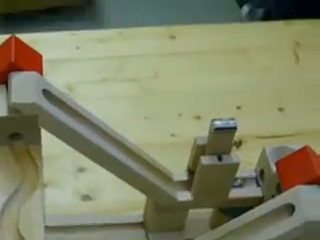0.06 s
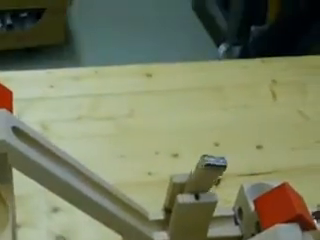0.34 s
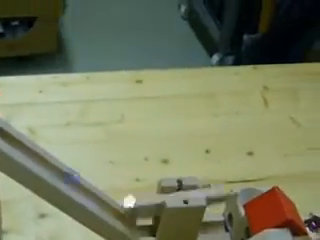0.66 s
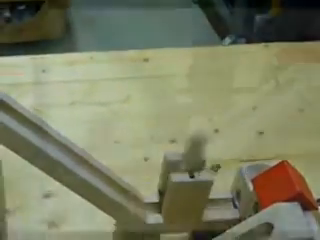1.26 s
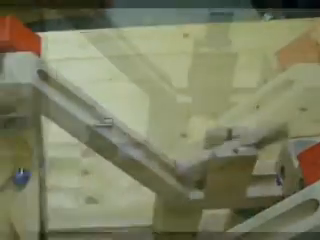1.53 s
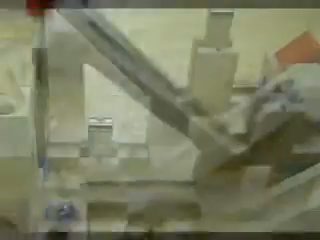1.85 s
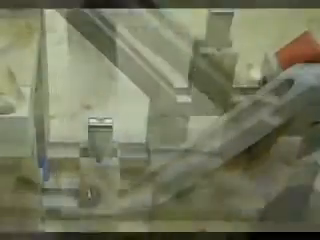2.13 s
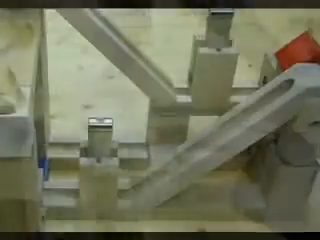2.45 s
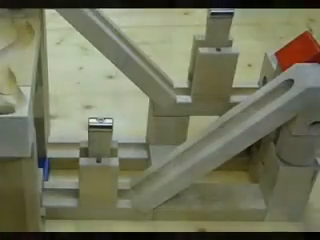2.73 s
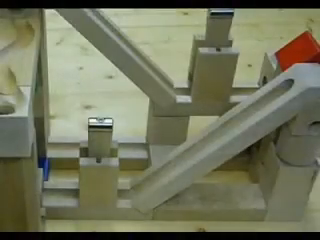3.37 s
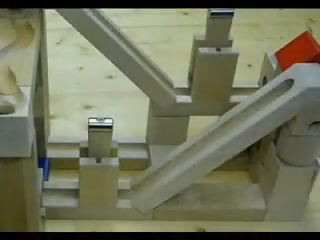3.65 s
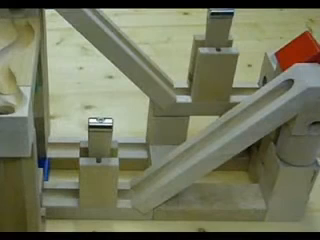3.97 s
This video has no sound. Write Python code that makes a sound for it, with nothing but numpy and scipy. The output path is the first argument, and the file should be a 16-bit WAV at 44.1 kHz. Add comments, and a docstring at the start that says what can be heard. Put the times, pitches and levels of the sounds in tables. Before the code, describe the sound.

Irregular wooden knocks and a low rumble of rolling marbles die down to faint taps.

```python
"""Knocks and a low rumble: marbles run down a wooden toy track, striking pivoting levers. Each impact excites
the resonances of track and table and reverberates in a workshop; rolling over the grain of the grooves makes
the rumble. The sound fades away to a few small taps. The microphone is dull above 4 kHz, and one short dry pop
breaks in near the end."""
import sys
import numpy as np
from scipy import signal
from scipy.io import wavfile
from scipy.ndimage import uniform_filter1d

SR = 44100
rng = np.random.default_rng(int(sys.argv[2]) if len(sys.argv) > 2 else 0)


def log_audio(samples):
    """Write samples as a 16-bit WAV file to the path given in sys.argv[1]."""
    # one column per channel
    frames = np.atleast_2d(samples).T
    # limit to full scale, then quantise
    limited = np.clip(frames, -1, 1)
    pcm = np.round(limited * 32767).astype(np.int16)
    wavfile.write(sys.argv[1], SR, pcm)


N = 176400
TIME = np.arange(N) / SR

# frequency response of the microphone: (f/Hz, gain/dB)
MIC_RESPONSE = [(3750, 2), (3900, -4), (4050, -19), (4600, -20), (5300, -48.5), (7000, -56.5),
                (12000, -59.5)]


def amp(db):
    """Amplitude ratio of a level in decibels."""
    return 10 ** (np.asarray(db) / 20)


def unit_energy(x):
    """Normalisation to an energy of one."""
    return x / np.sqrt(np.sum(x ** 2) + 1e-20)


def unit_rms(x):
    """Normalisation to an rms of one."""
    return unit_energy(x) * np.sqrt(x.size)


def curve(points, hz=abs(np.fft.fftfreq(2048, 1 / SR))):
    """Interpolation over log frequency, by default at the bins of a full FFT."""
    f, value = np.transpose(points)
    return np.interp(np.log(hz + 1), np.log(f + 1), value)


def add(mix, start_s, sound):
    """Superposition of a delayed sound on the mix."""
    part = mix[max(round(start_s * SR), 0):][:len(sound)]
    part += sound[:len(part)]


def minimum_phase(gain_db):
    """Causal impulse response of a gain curve, its phase given by the Hilbert transform."""
    log_spectrum = np.conj(signal.hilbert(np.log(amp(gain_db))))
    return np.fft.ifft(np.exp(log_spectrum)).real[:len(gain_db) // 2]


def convolve(x, response):
    """Linear filtering, cut to the length of x."""
    return signal.oaconvolve(x, response)[:len(x)]


def room_tail(size=32768, build_up_s=0.0034):
    """Reverberation: dense reflections decay exponentially, the treble first."""
    # reverberation time of the workshop: (f/Hz, T60/s)
    decay_times = [(100, .8), (300, 0.38), (900, 0.46), (2000, 0.49), (3700, 0.45), (5200, 0.11)]
    hz, t, spectra = signal.stft(rng.standard_normal(size), SR, nperseg=256)
    decay = amp(-60 * t / curve(decay_times, hz)[:, None])
    tail = signal.istft(spectra * decay, SR)[1][:size]
    return unit_energy(tail * np.minimum(np.arange(size) / SR / build_up_s, 1))


def rolling(bumps_per_s=900, wobble_db=4):
    """Roughness excitation: marbles bump over the wood grain, giving a rumble and a finer rattle."""
    # course of the rolling noise: (t/s, rumble level/dB, rattle level/dB)
    levels = [(0, -38.5, -32.5), (.25, -34, -36.5), (.43, -43, -40.5), (0.679, -40.5, -36),
              (0.948, -39.5, -41), (1.1, -35, -31.5), (1.22, -35, -41.5), (1.49, -38, -44),
              (1.58, -44.5, -44), (1.8, -37, -36.5), (1.88, -45, -46.5), (2.08, -40.5, -44),
              (2.2, -50.5, -53), (2.48, -47.5, -51.5), (2.56, -48, -49), (2.85, -58, -64),
              (3.05, -68.5, -72)]
    # spectra of rumble and rattle: (f/Hz, relative level/dB)
    rumble_spectrum = [(30, -7), (80, -16.5), (125, -1.5), (210, -0.5), (380, 1.5), (550, -0.5),
                       (900, -3.5), (2000, -29), (4000, -57)]
    rattle_spectrum = [(100, -29), (500, -13.5), (1000, 10.5), (1600, 4), (2600, 0), (3800, -4.5),
                       (8000, -18)]
    times, rumble_db, rattle_db = np.transpose(levels)
    sign = rng.choice([-1, 1], N)
    wobble = np.tanh(unit_rms(uniform_filter1d(rng.standard_normal(N), size=1500)))
    bumps = sign * (rng.random(N) < bumps_per_s / SR) * amp(wobble_db * wobble)
    bumps = bumps + convolve(bumps, room_tail())
    out = np.zeros(N)
    for spectrum, db in [(rumble_spectrum, rumble_db), (rattle_spectrum, rattle_db)]:
        response = minimum_phase(curve(spectrum) + curve(MIC_RESPONSE))
        out += amp(np.interp(TIME, times, db)) * unit_rms(convolve(bumps, response))
    return out


def contact(size=2048, bounces_per_s=2600, decay_s=0.0045, chatter_db=1.5):
    """Rebound: one sharp impulse, then milliseconds of chatter as the marble bounces on the wood."""
    t = np.arange(size) / SR
    bounces = rng.standard_normal(size) * (rng.random(size) < bounces_per_s / SR)
    force = amp(chatter_db) * unit_energy(bounces * np.sqrt(t) * np.exp(-t / decay_s))
    force[0] += 1
    return force


def resonate(x, hz, stage_width_hz):
    """Resonance with steep skirts: two equal band-pass stages in cascade."""
    b, a = signal.iirpeak(hz, hz / stage_width_hz, SR)
    return signal.lfilter(b, a, signal.lfilter(b, a, x))


def knocks(tail_count=7, attack_widening=1.5, gain_db=22):
    """Impact excitation: the table thuds, the wood clacks, the struck piece rings; all reverberate."""
    # marble and lever impacts, in relative levels:
    # (t/s, thud level/dB, clack level/dB, ring level/dB, ring f/Hz, reverberation level/dB)
    impacts = [(.0015, -25, -25, -16.5, 2760, -14), (0.0194, -24, -19, -20, 2910, 6),
               (0.1541, -31, -27, -32, 2800, 6), (0.2286, -28.5, -28, -10.5, 2540, 3),
               (0.2449, -44.5, -36.5, -13, 2804, 6.5), (0.281, -27.5, -19, -13.5, 2730, -7.5),
               (0.3205, -38.5, -37, -18, 3513, 9.5), (0.529, -45.5, -31.5, -30.5, 2510, 13.5),
               (.552, -37.5, -29.5, -32, 2920, 11), (0.7545, -27, -22, -15, 3280, 4),
               (0.7683, -27, -25, -14.5, 2420, 1.5), (0.774, -35.5, -35, -12, 3086, 5),
               (0.8868, -37, -35.5, -21.5, 2630, -5), (0.8916, -39.5, -26.5, -14, 3170, -4.5),
               (0.9752, -30, -23.5, -15, 2650, -0.5), (1.0329, -32, -29, -37.5, 2950, 4),
               (1.044, -36.5, -20.5, -31, 3100, -0.5), (1.1122, -34.5, -30.5, -34.5, 2410, 6),
               (1.2256, -29, -20.5, -57, 2790, -2.5), (1.2597, -26, -19.5, -20.5, 2760, 2),
               (1.2963, -40, -33.5, -20.5, 2400, 1), (1.3325, -47, -29, -29, 3000, -6),
               (1.594, -29.5, -23, -47, 2600, -4), (1.6253, -27.5, -19.5, -17, 2760, -4.5),
               (1.684, -32, -21.5, -19, 2630, -3), (1.7361, -34, -22.5, -22.5, 2560, -10),
               (2.0092, -32, -31, -32, 2580, 2.5), (2.0419, -39, -28, -28.5, 3320, -8),
               (2.5149, -41, -49.5, -43, 2310, -1.5), (2.6429, -47.5, -51.5, -46.5, 2265, 5.5),
               (2.8134, -54.5, -41.5, -45, 2540, 4), (2.931, -55, -56, -41.5, 2700, -9),
               (3.1103, -63, -53.5, -51, 2890, 2), (3.128, -60.5, -55.5, -58.5, 2874, 6),
               (3.3877, -73.5, -58.5, -66, 2780, -2), (3.4955, -62, -61, -57.5, 1110, 12.5),
               (3.574, -59.5, -61.5, -61, 970, 5), (3.69, -70.5, -50, -51.5, 2297, -3.5),
               (3.701, -59, -56.5, -52, 2520, 0.5)]
    # spectra of thud and clack: (f/Hz, relative level/dB)
    thud_spectrum = [(40, -17.5), (90, -11), (135, 2), (210, -5), (300, -1.5), (550, 1.5), (800, -7.5),
                     (1500, -27.5), (4000, -48.5)]
    clack_spectrum = [(100, -52.5), (500, -16), (950, 1), (1400, 5.5), (2000, 6.5), (2800, 0.5), (3800, 1),
                      (8000, -17.5)]
    # damping of the struck pieces; small hard ones ring more purely: (f/Hz, base bandwidth/Hz)
    ring_widths = [(1000, 130), (2700, 700), (3200, 680), (3500, 350)]
    tail_trim_db = np.array([2.5, 3, -2.5])  # thud, clack, ring
    mic_db = curve(MIC_RESPONSE)
    responses = [minimum_phase(db + mic_db) for db in (curve(thud_spectrum), curve(clack_spectrum), 0)]
    rooms = [room_tail() for _ in range(tail_count)]

    def radiate(force, levels_db, ring_hz, width_hz):
        """Superposition of the thud, clack and ring that one force excites."""
        thud, clack, broadband = (convolve(force, response) for response in responses)
        ring = resonate(broadband, ring_hz, width_hz)
        return sum(amp(db) * unit_energy(part) for db, part in zip(levels_db, (thud, clack, ring)))

    out = np.zeros(N)
    for k, (start_s, *levels_db, ring_hz, reverb_db) in enumerate(impacts):
        width_hz = curve(ring_widths, ring_hz)
        direct = radiate(contact(), levels_db, ring_hz, attack_widening * width_hz)
        tail = radiate(rooms[k % tail_count], tail_trim_db + levels_db, ring_hz, width_hz)
        add(out, start_s, direct)
        add(out, start_s, amp(reverb_db) * tail)
    return amp(gain_db) * out


def body(x):
    """Forced vibration: the modes of track and table respond to the shaking x."""
    # modes of track and table: (f/Hz, bandwidth/Hz, gain/dB)
    modes = [(300.4, 18, 2), (543, 20, -7), (967, 27, -3.5)]
    return x + sum(amp(db) * signal.lfilter(*signal.iirpeak(hz, hz / width, SR), x)
                   for hz, width, db in modes)


def hollow_pieces(size=22050, rise_s=0.0013, t60_s=0.22, room_db=-6):
    """Damped free vibration: knocked hollow blocks and levers, and the table's low mode, ring at one pitch each
    into the room."""
    # ringing wooden pieces and the table's low mode: (t/s, f/Hz, level/dB)
    pieces = [(0.0191, 532, -20.5), (.0194, 121, -25), (0.2281, 294, -24), (0.5307, 393.7, -28),
              (0.7692, 1573, -26), (.774, 121.4, -29), (1.0325, 952, -26.5), (1.2595, 540, -23),
              (1.2602, 308.4, -21.5), (1.685, 1190, -31), (1.791, 364, -33.5), (2.0419, 959.7, -29.5)]
    t = np.arange(size) / SR
    envelope = (1 - np.exp(-t / rise_s)) * amp(-60 * t / t60_s)
    out = np.zeros(N)
    for start_s, hz, db in pieces:
        add(out, start_s, amp(db) * envelope * np.sin(2 * np.pi * hz * t))
    return out + amp(room_db) * convolve(out, room_tail())


def winding_groove(width_hz=24):
    """Randomly driven resonance: a marble makes the groove sing, the pitch wavering as it moves."""
    # course of the groove's tone: (t/s, f/Hz, level/dB)
    course = [(0.071, 1016, -38.5), (0.238, 1048, -38.5), (.37, 953, -36)]
    times, hz, db = np.transpose(course)
    envelope = uniform_filter1d(np.interp(TIME, times, amp(db), left=0, right=0), size=1323)
    noise = rng.standard_normal(N) + 1j * rng.standard_normal(N)
    shaking = signal.lfilter(*signal.butter(2, width_hz / 2, fs=SR), noise)
    phase = 2 * np.pi * np.cumsum(np.interp(TIME, times, hz)) / SR
    return envelope * unit_rms((shaking * np.exp(1j * phase)).real)


def dry_pop(start_s=3.1725, length_s=0.0069, step=-0.098, crackle_db=-18):
    """Broadband transient: an abrupt burst of crackle on a step, cut hard on and off."""
    # spectrum of the crackle: (f/Hz, relative level/dB)
    spectrum = [(300, -23), (600, 8), (1000, 4.5), (1500, 2.5), (2700, 6.5), (3600, -7)]
    roll_off_db = np.maximum(curve(MIC_RESPONSE), -22.5)  # the floor lets some fizz through
    crackle = convolve(rng.standard_normal(2048), minimum_phase(curve(spectrum) + roll_off_db))
    out = np.zeros(N)
    add(out, start_s, step + amp(crackle_db) * unit_rms(crackle[-round(length_s * SR):]))
    return out


def scene():
    """Mid-side stereo: the toy stands in the centre, and reflections add a trace of width."""
    # spectrum of the lateral reflections: (f/Hz, side level re mid/dB)
    side_spectrum = [(350, -44), (700, -23.5), (1400, -23.5), (2500, -48.5)]
    mid = body(knocks() + rolling()) + hollow_pieces() + winding_groove()
    reflections = convolve(mid, unit_energy(room_tail()[:2048]))
    side = convolve(reflections, minimum_phase(curve(side_spectrum)))
    return np.array([mid + side, mid - side])


def record(dry):
    """Distortion and noise: soft saturation, whine and hiss; a pop breaks in, then all falls silent."""
    # drift of the zero line: (t/s, offset/full scale)
    drift = [(0, -0.088), (1.13, -0.094), (2.05, -.034), (2.55, -0.01), (3.0, -0.0013), (3.75, -.001)]
    # steady electronic tones: (f/Hz, level/dB)
    whines = [(4500, -89.5), (9000, -93.5), (12000, -81)]
    drive, hiss_db = 0.24, -84
    clock_hz, clock_depth_db = 8000, -53.5
    off_s, fade_s, band_limit_hz = 3.75, 0.0043, 12400
    offset = np.interp(TIME, *np.transpose(drift))
    saturated = np.tanh(drive * (dry + offset)) / drive
    clock_leakage = 1 + amp(clock_depth_db) * np.sin(2 * np.pi * clock_hz * TIME)
    whine = sum(amp(db) * np.sin(2 * np.pi * hz * TIME) for hz, db in whines)
    hiss = amp(hiss_db) * rng.standard_normal(N)
    shut_off = np.exp(-np.maximum(TIME - off_s, 0) / fade_s)
    out = (saturated * clock_leakage + whine + hiss + dry_pop()) * shut_off
    low_pass = signal.firwin(511, band_limit_hz, window=("kaiser", 9), fs=SR)
    return signal.oaconvolve(out, low_pass[None], "same")


dry = scene()
out = record(dry)
log_audio(out)
```